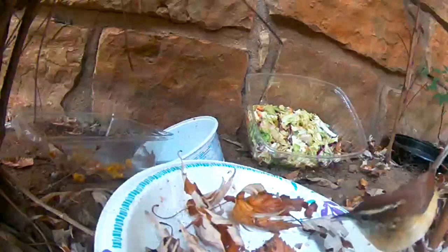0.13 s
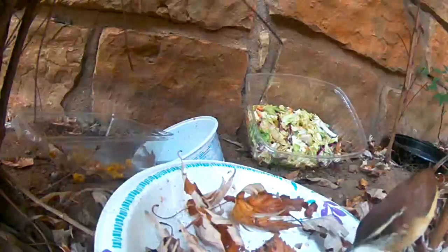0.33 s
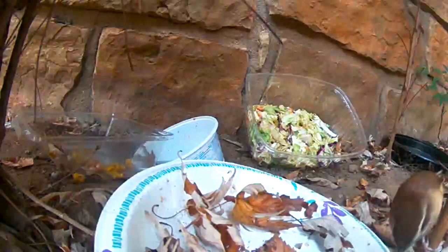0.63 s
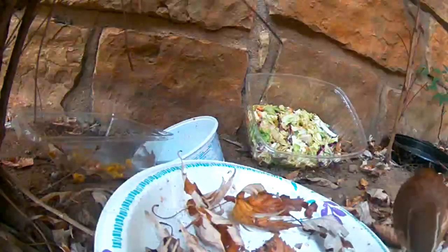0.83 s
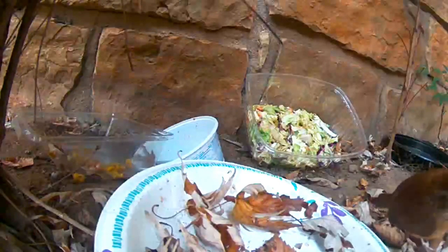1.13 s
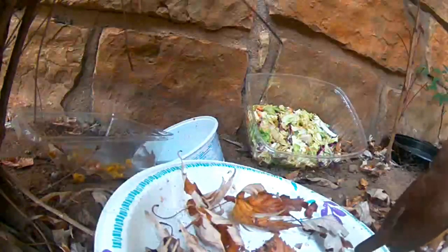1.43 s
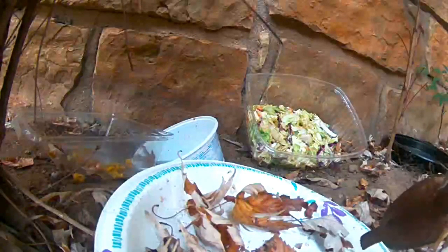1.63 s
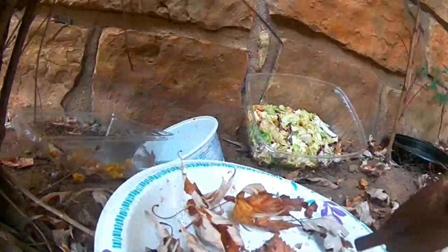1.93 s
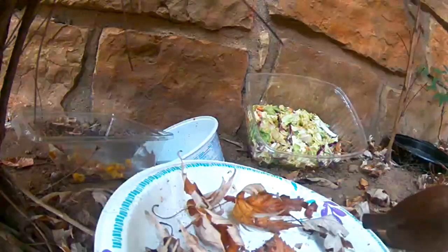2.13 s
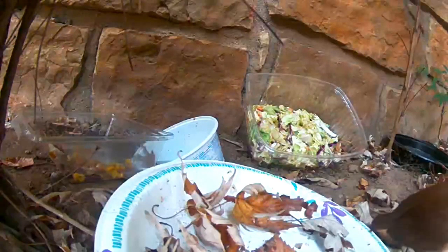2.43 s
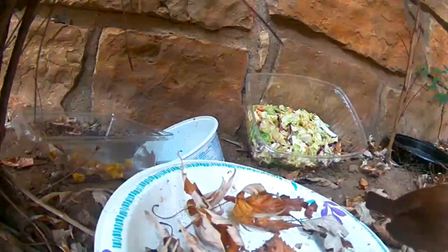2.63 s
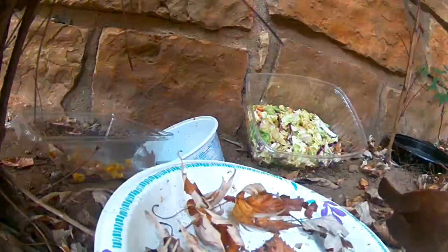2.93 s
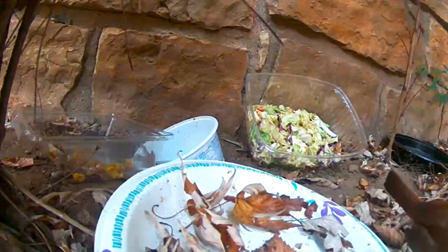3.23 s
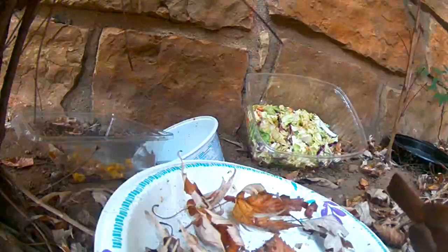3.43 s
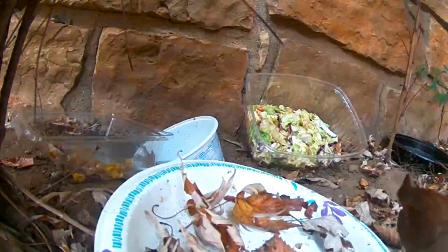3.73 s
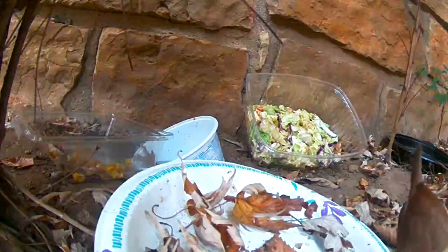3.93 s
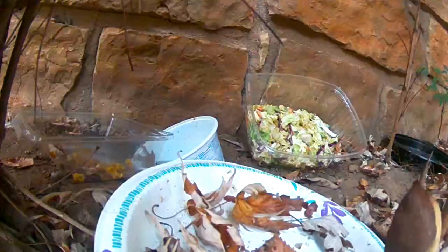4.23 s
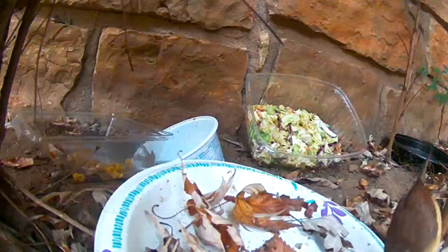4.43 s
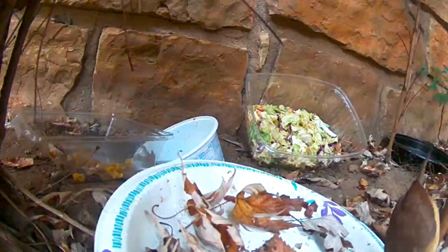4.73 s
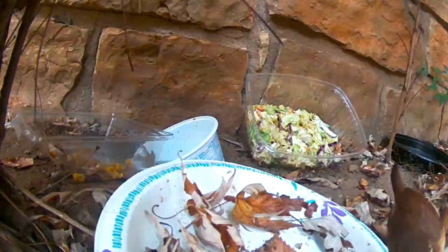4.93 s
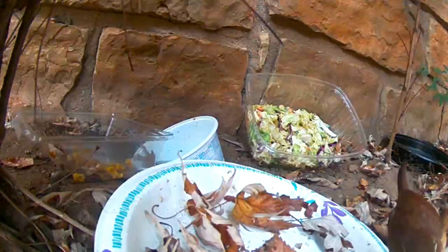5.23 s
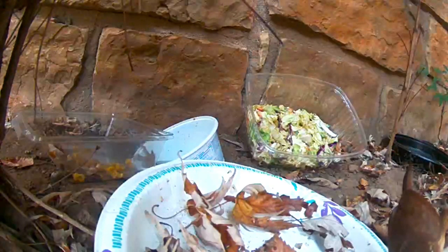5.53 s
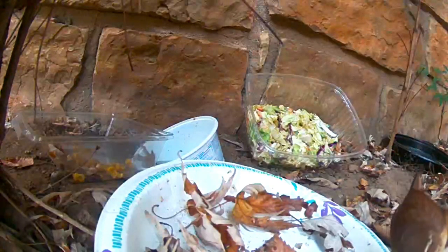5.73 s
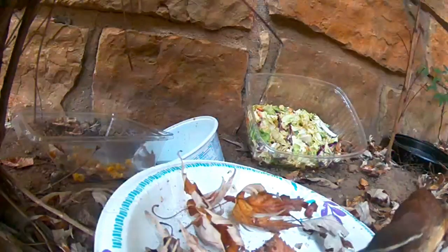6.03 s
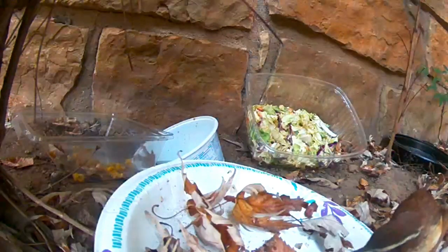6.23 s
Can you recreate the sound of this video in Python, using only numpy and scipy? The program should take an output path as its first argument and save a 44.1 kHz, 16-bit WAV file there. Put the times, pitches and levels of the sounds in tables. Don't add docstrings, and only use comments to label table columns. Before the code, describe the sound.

A quiet yard with a constant low traffic rumble and thin hiss. In the first 1.5 s there are only very faint far bird chips, soft hoots and tiny leaf ticks. From about 1.4 to 2 s claws scratch dry leaves in small dry clicks, and a distant wren call sounds at 1.8 s. From 2.4 to 4.2 s a wren sings eight fast phrases, over four per second, each of four sweeping whistled notes, high then low; it starts quieter, swells, stays even, and carries short wall echoes and a slightly glassy digital edge. At 4.1 to 4.6 s close scratches, hard pecks and short hollow plate knocks strike. Another distant call comes at 4.7 s, with light scratches near 4.85 s and faint chips around 5 s. At 5.9 s a loud bright rim click, a brief leaf crunch and a last distant call close it.

```python
import sys
import numpy as np
from scipy import signal
from scipy.fft import rfft, irfft
from scipy.io import wavfile
from scipy.ndimage import uniform_filter1d

SR = 44100
rng = np.random.default_rng(int(sys.argv[2]) if len(sys.argv) > 2 else 0)


def volts_from_decibels(level):
    exponent = np.asarray(level, float) / 20
    return 10 ** exponent


def master(y):
    cut = np.clip(np.atleast_2d(y).T, -1, 1)
    pcm = np.round(cut * 32767)
    wavfile.write(sys.argv[1], SR, pcm.astype(np.int16))


N = 280917

# f/Hz, density/dB per Hz
RUMBLE_SPECTRUM = [(12, -40), (20, -6.5), (43, 1), (79, -.5), (102, -8), (156, -4), (238, -19), (330, -53)]
# f/Hz, density/dB per Hz
HISS_SPECTRUM = [(200, -26), (340, -18.5), (413, -27), (480, -22), (586, -30), (1500, -40), (7900, -48),
                 (10300, -85)]
# delay/ms, level/dB
CLEAR_PATHS = [(2.6, -27), (6.5, -13), (10.5, -21.5), (15.5, -11.5), (20.5, -22.5), (30.0, -22.5),
               (52.0, -26)]
# delay/ms, level/dB, t60/s
CLOSE_SCATTER = [(2.1, -5, 0.08), (12, -16.5, 0.43)]
# delay/ms, level/dB, t60/s
FAR_RETURNS = [(164, -21, 0.24), (212, -23, 0.22), (275, -23, 0.55)]
# t/s, length/s, start f/Hz, end f/Hz, level/dB
FAR_CHIPS = [(.089, .043, 5500, 5860, -75.5), (.16, 0.065, 4250, 3600, -77), (.928, .035, 5430, 5330, -77),
             (1.279, .034, 5600, 6300, -74), (1.357, .027, 4000, 3810, -71.5),
             (1.659, 0.033, 5200, 4140, -76), (3.98, .024, 4340, 4500, -61.5), (4.92, .04, 3300, 5300, -79),
             (4.968, .013, 4720, 4200, -68), (5, .026, 3780, 4830, -70), (5.025, .02, 3670, 3480, -75),
             (5.819, 0.014, 4670, 5000, -69), (5.831, .012, 3640, 3380, -64), (.93, 0.14, 3880, 3700, -81)]
# t/s, length/s, f/Hz, level/dB
FAR_HOOTS = [
    (0.643, .11, 1015, -69),
    (.66, .4, 1500, -78),
    (1.54, 0.12, 861, -70),
    (2.299, .11, 817, -70),
    (2.629, 0.16, 724, -71.5),
    (3.251, .19, 920, -74),
]
# t/s of the rise, level/dB, opening fall/s, its span/Hz, closing note/dB
SECOND_WREN = [
    (1.808, -57.5, 0.063, 1200, -1),
    (4.717, -56, 0.06, 1080, -3.5),
    (5.868, -53.5, .045, 620, -8),
]
# t/s, rms level/dB, t60/s
LEAF_CRUSHES = [
    (5.895, -38.5, 0.091),
    (4.3, -62, 0.13),
    (1.27, -65.5, 0.26),
    (1.7, -65, 0.33),
]
# t/s, peak level/dB, f/Hz, t60/s
PLATE_MODES = [
    (4.2612, -36, 455, 0.024),
    (4.2612, -30.5, 698.4, 0.015),
    (4.2612, -27.5, 936, 0.013),
    (4.2612, -33.5, 1830, 0.017),
    (4.41, -33, 786, 0.0091),
    (4.417, -42, 666, 0.012),
    (4.58, -48, 710, 0.013),
    (5.8945, -18.5, 6380, 0.0072),
]
# t/s, peak level/dB, ring f/Hz
CLAW_SCRATCHES = [(0.884, -61, 4170), (1.0645, -67, 3210), (1.277, -63, 5960), (1.4676, -54, 2900),
                  (1.5409, -55, 6300), (1.7514, -48.5, 4400), (1.805, -55, 3360), (1.907, -61, 3070),
                  (1.9336, -51, 3200), (1.9917, -56, 5600), (2.7823, -58, 4050), (2.796, -55.5, 3010),
                  (4.1129, -44, 3100), (4.4364, -47, 3100), (4.441, -53.5, 3770), (4.589, -64, 3380),
                  (4.8548, -52.5, 4160), (4.8742, -62.5, 3170), (5.9424, -59, 3220)]
# t/s, peak level/dB, ring f/Hz, body above the snap/dB, t60/s
BILL_PECKS = [(0.651, -74.5, 3340, 14, 0.016), (4.2607, -35.5, 3150, -0.5, 0.014),
              (4.2725, -29.5, 6600, -14.5, 0.012), (4.3911, -25, 3640, -14, 0.0094),
              (4.4088, -53, 3000, 5, 0.011), (4.423, -37, 4300, -15, 0.01), (4.4563, -46, 4540, -11, 0.02),
              (4.4664, -49.5, 3790, -10, 0.018), (5.8932, -28.5, 6850, -19.5, 0.026),
              (5.9084, -35, 7800, -22, 0.025), (5.9248, -56, 3230, -40, .02)]
# t/ms, f/Hz, level/dB
HIGH_FALL = [(0, 4830, -25), (6, 4740, -9), (12.9, 4560, -3.5), (20, 4260, -3), (29.2, 4030, -5.5),
             (33.6, 3900, -16)]
HIGH_RISE = [(0, 3070, -14), (3.04, 3270, -3.5), (8.3, 3380, 4), (13.5, 3570, 4), (21.2, 3950, -4),
             (25.2, 4050, -6), (29.3, 4300, -20)]
LOW_FALL = [(1.48, 2850, -33), (9.26, 2620, 4), (12.3, 2440, -7), (15.4, 2230, -1), (20.6, 2020, -13),
            (26, 1840, -5), (30.43, 1690, -12.5), (35.9, 1120, -25.5)]
LOW_RISE = [(0, 1890, -26.5), (12.64, 2290, -15), (15.67, 2390, -2.5), (19.36, 2610, -10.5),
            (22.7, 2753, 6.5), (25.9, 2910, 1), (31.4, 2960, -2.4), (36.2, 2950, -5.5), (40.7, 3600, -46)]
# t/s of the last note, low pair level/dB, low pitch ratio, high rise level/dB, high pitch ratio
SONG_PHRASES = [
    (2.562, -42, 1.002, -47.5, 1.05),
    (2.790, -39, .98, -44.5, 0.93),
    (3.010, -37, 1.007, -42.5, 0.96),
    (3.236, -36.5, 1.007, -41.5, 1),
    (3.459, -36.5, 1, -41.5, 0.96),
    (3.684, -36.5, 1.003, -41, 0.982),
    (3.909, -38, 1.007, -40.5, 1.018),
    (4.137, -37.5, .998, -39.5, 1),
]
# lead before the last note/ms, level/dB, pitch ratio, sweep width ratio, end above middle/dB
OPENING_NOTES = [
    (149, -55, 1.16, 1.3, 2),
    (158, -54, .99, .85, 10.5),
    (153.3, -51.5, .995, .7, 5),
    (154.2, -48, 1.02, 1.14, 4),
    (157.8, -52.5, 1.005, 0.92, 13.5),
    (158.5, -45.5, .99, 0.98, 4),
    (157.8, -51, 1, 1.02, 14),
    (139.2, -49.5, .97, 0.83, -10),
]


def add(out, s, piece):
    i = int(s * SR)
    out[i:i + len(piece)] += piece[:N - i]


def whistle(ms, hz, level_db):
    t = np.arange(int(ms[0] * SR / 1000), int(ms[-1] * SR / 1000)) * 1000 / SR
    phase = 2 * np.pi * np.cumsum(np.interp(t, ms, hz)) / SR
    return np.sqrt(2) * volts_from_decibels(np.interp(t, ms, level_db)) * np.sin(phase)


def dying(t60, size):
    x = rng.standard_normal(size) * volts_from_decibels(-60 * np.arange(size) / SR / max(t60, 1e-3))
    return x / np.sqrt(np.sum(x ** 2))


def band(x, low_hz, high_hz):
    sos = signal.butter(1, [low_hz, min(high_hz, 9000)], "band", fs=SR, output="sos")
    return signal.sosfilt(sos, x)


def flutter(low_hz, high_hz):
    sos = signal.butter(3, [low_hz, high_hz], "band", fs=SR, output="sos")
    x = signal.sosfilt(sos, rng.standard_normal(N))
    return x / x.std()


def yard(x, clear_db, scatter_db):
    near, far = np.zeros(SR), np.zeros(SR)
    near[0] = volts_from_decibels(clear_db)
    for response, bursts in ((near, CLOSE_SCATTER), (far, FAR_RETURNS)):
        for ms, db, t60 in bursts:
            add(response, ms / 1000, volts_from_decibels(db + scatter_db) * dying(t60, size=22050))
    for ms, db in CLEAR_PATHS:
        add(near, ms / 1000, volts_from_decibels([db + clear_db]))
    far = signal.sosfilt(signal.butter(4, 2150, fs=SR, output="sos"), far)
    leaf_stir = 0.76
    stirred = x * (np.sqrt(1 - leaf_stir) + np.sqrt(leaf_stir) * flutter(22, 270))
    return (signal.fftconvolve(x, near) + signal.fftconvolve(stirred, far))[:N]


def air():
    log_hz = np.log(np.maximum(np.arange(N // 2 + 1) * SR / N, 1))
    gains = []
    for spectrum in (RUMBLE_SPECTRUM, HISS_SPECTRUM):
        hz, db = np.transpose(spectrum)
        gains.append(volts_from_decibels(np.interp(log_hz, np.log(hz), db, right=-120)))
    x = irfft(rfft(rng.standard_normal(N)) * np.hypot(*gains), N)
    return volts_from_decibels(-45.5) * x / x.std()


def churrs():
    centre_hz, fall_db = 4070, -5.5
    early = 0.73
    rows = []
    for s, db, fall_s, span_hz, close_db in SECOND_WREN:
        top_hz, bottom_hz = centre_hz + span_hz / 2, centre_hz - span_hz / 2
        rows.append((s - early * fall_s, fall_s, top_hz, bottom_hz, db + fall_db))
        rows.append((s, .024, 2980, 3550, db))
        rows.append((s + .015, .023, 3500, 2920, db + close_db))
    return rows


def far_calls():
    out, quick = np.zeros(N), flutter(25, 260)
    slow = uniform_filter1d(quick, size=450)
    slow = slow / slow.std()
    hoots = [(s, length, hz, hz * 0.93, db) for s, length, hz, db in FAR_HOOTS]
    for calls, rough, wobble in ((FAR_CHIPS, .9, quick), (churrs(), .5, quick), (hoots, .7, slow)):
        for s, length, start_hz, end_hz, db in calls:
            ms = 1000 * length * np.array([0, .2, .8, 1])
            glide_hz = start_hz + (end_hz - start_hz) * ms / ms[-1]
            tone = whistle(ms, glide_hz, db + np.array([-4, 0.5, 0.0, -14]))
            add(out, s, tone * (1.1 - rough + rough * wobble[int(s * SR):][:len(tone)]))
    return yard(out, clear_db=-2.5, scatter_db=6.0)


def crunch():
    out = np.zeros(N)
    for s, db, t60 in LEAF_CRUSHES:
        burst = band(dying(t60, size=8192), 2200, 5300)
        add(out, s, volts_from_decibels(db) * burst / burst[:400].std())
    return out


def thumps():
    out, t = np.zeros(N), np.arange(4096) / SR
    for s, db, hz, t60 in PLATE_MODES:
        add(out, s, volts_from_decibels(db - 60 * t / t60) * np.sin(2 * np.pi * hz * t))
    return out


def ticks():
    out = np.zeros(N)
    scratches = [(*row, -5.5, 0.034) for row in CLAW_SCRATCHES]   # body/dB, t60/s
    for s, db, hz, body_db, t60 in BILL_PECKS + scratches:
        crack = dying(t60, size=4096)
        crack[0] -= 1.3
        snap = band(band(crack, hz * 0.45, hz * 1.48), hz * .5, hz * 1.62)
        body = band(crack + dying(t60 * 3.3, size=4096), 430, 2030)
        rustle = band(dying(0.044, size=4096), 1040, 4400)
        tick = np.zeros(4096)
        for part, rel_db in ((snap, 6.5), (body, body_db + 14.0), (rustle, -11.5)):
            tick += volts_from_decibels(db + rel_db) * part / np.abs(part).max()
        add(out, s + .0008, tick)
    return out


def wren():
    out, wobble = np.zeros(N), flutter(63, 203)
    song_rough, opener_rough = 0.11, 0.48
    for k, (phrase, opening) in enumerate(zip(SONG_PHRASES, OPENING_NOTES)):
        s, low_db, low, high_db, high = phrase
        lead_ms, *opener = opening
        closing = .87 if k == len(SONG_PHRASES) - 1 else 1
        rise_width = closing * (1.1 - k * 0.018)
        swell_db = 5 - k * 1.04
        # shape, start/s, level/dB, pitch ratio, sweep width ratio, end-to-middle rise/dB, flutter share
        notes = ((HIGH_FALL, s - lead_ms / 1000, *opener, opener_rough),
                 (HIGH_RISE, s - .1195, high_db, high, rise_width, swell_db, song_rough),
                 (LOW_FALL, s - .0697, low_db - 4.5, low * 1.02, closing * 0.94, 0, song_rough),
                 (LOW_RISE, s, low_db, low, closing, 0, song_rough))
        for shape, start, level_db, tune, width, rise_db, rough in notes:
            ms, hz, db = np.transpose(shape)
            anchor = hz[-2] if shape is LOW_RISE else hz[0]
            head_turn_db = 1.2 * rng.standard_normal(len(ms))
            swing_db = head_turn_db + rise_db * (2 * ms / ms[-1] - 1)
            tone = whistle(ms, tune * (anchor + width * (hz - anchor)), db + level_db + swing_db)
            start += ms[0] / 1000
            add(out, start, tone * (1 + rough * wobble[int(start * SR):][:len(tone)]))
    return yard(out, clear_db=3.0, scatter_db=3.5)


def scene():
    return (air() + far_calls() + crunch() + thumps() + ticks() + wren())[None]


def top_cut(x):
    return signal.sosfilt(signal.butter(12, 16160, fs=SR, output="sos"), x)


def record(dry):
    camera_sr = 16000
    hz = np.minimum(np.arange(N // 2 + 1) * SR / N, 8600)
    bright = irfft(rfft(dry[0]) / np.sinc(hz / camera_sr) ** 2, N)
    slow = signal.resample_poly(bright, 160, 441)
    joined = np.interp(np.arange(N) / SR, np.arange(len(slow)) / camera_sr, slow)
    joined = signal.sosfilt(signal.cheby2(10, 50, 16800, fs=SR, output="sos"), joined)
    return top_cut(joined[None] + 0.00038)


dry = scene()
out = record(dry)
master(out)
```